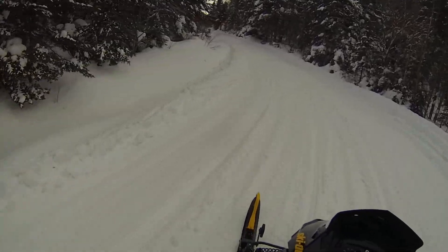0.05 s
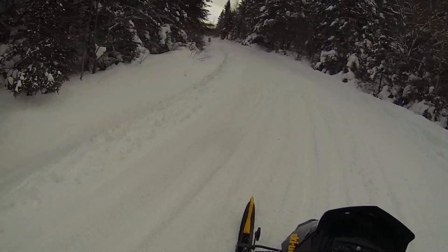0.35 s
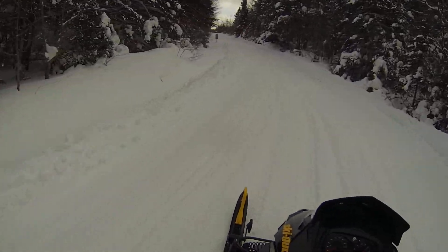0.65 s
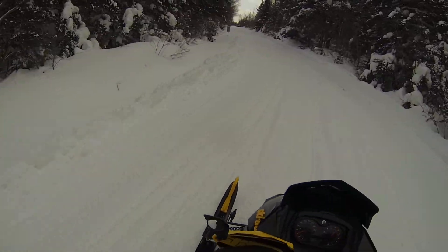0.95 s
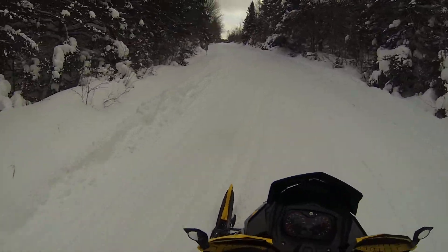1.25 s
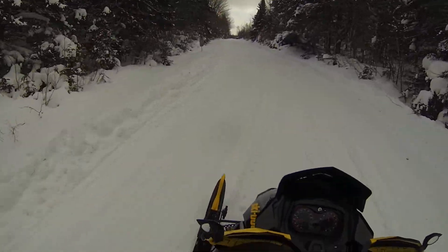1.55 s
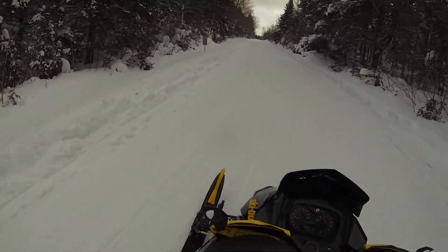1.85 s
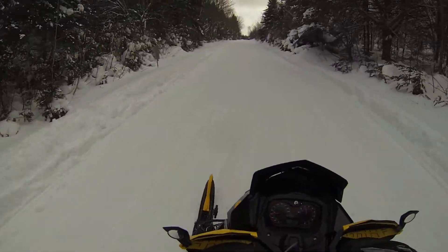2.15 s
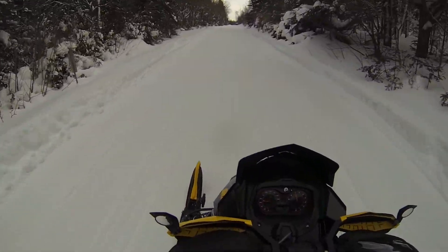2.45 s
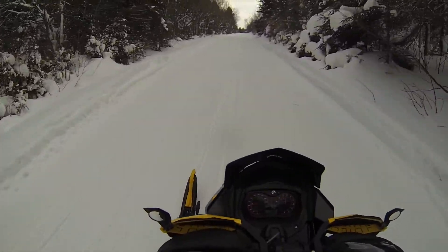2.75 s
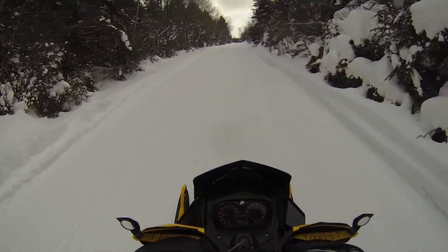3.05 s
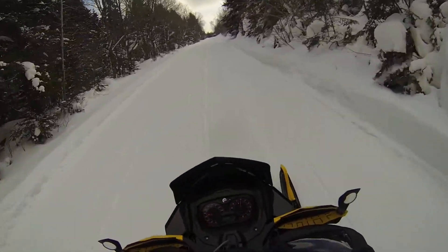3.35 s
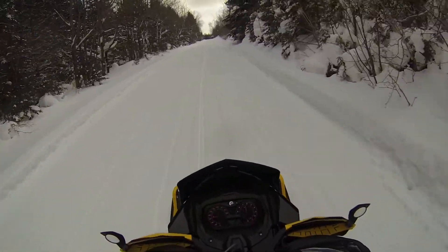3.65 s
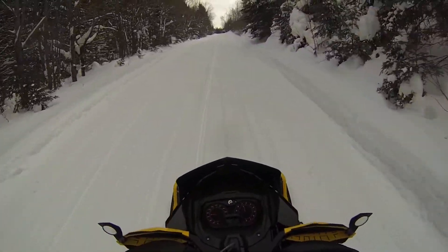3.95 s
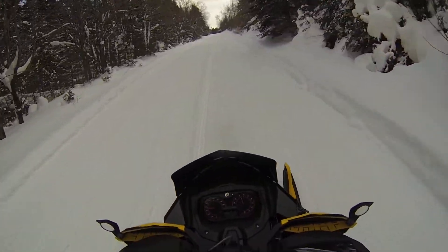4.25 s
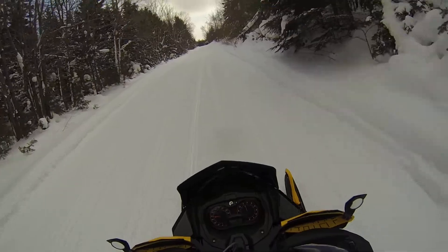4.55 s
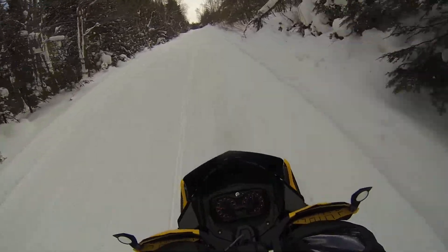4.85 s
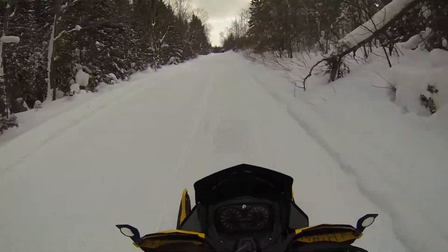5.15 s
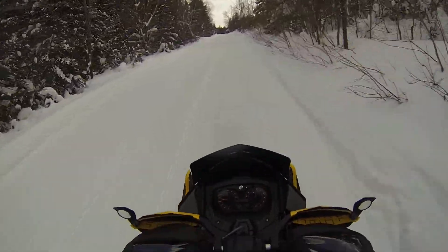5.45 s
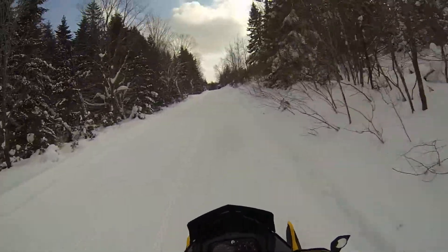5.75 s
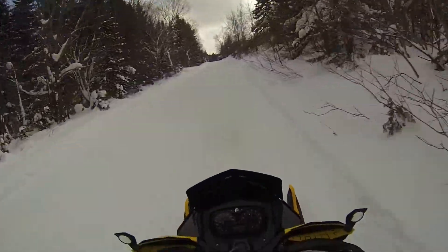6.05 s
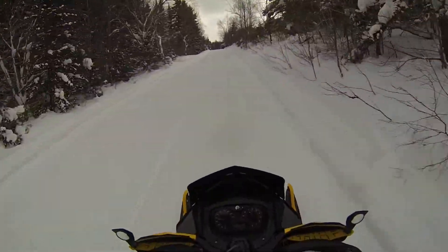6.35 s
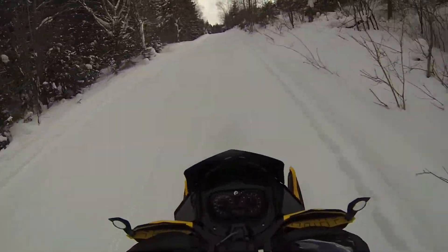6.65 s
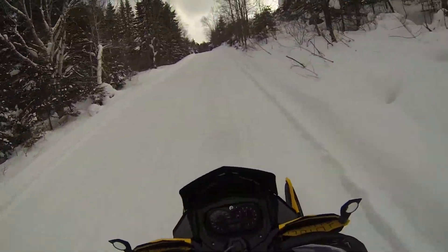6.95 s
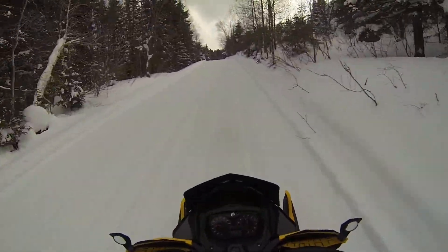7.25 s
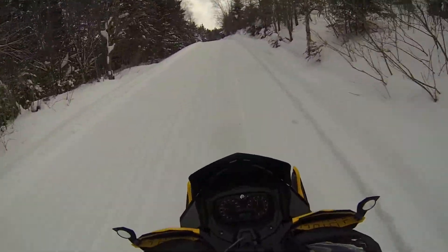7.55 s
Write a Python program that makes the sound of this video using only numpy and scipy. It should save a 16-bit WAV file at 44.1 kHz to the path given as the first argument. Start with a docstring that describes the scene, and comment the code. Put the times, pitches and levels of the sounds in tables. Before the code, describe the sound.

Heard close from the rider's helmet, a snowmobile gathers speed on a forest trail. Its engine rises in pitch and a quick run of sharp ticks strikes the microphone case. The drone dips, picks up and holds, over a dry belt whir and the hum of the track. Boxy rushing air, hissing snow and low gusts of wind swell until they are strongest near the end, with scattered duller knocks.

```python
"""A snowy forest trail, heard from a camera in a case on the helmet of a snowmobile rider.
The snowmobile gathers speed. Its three-cylinder four-stroke engine drones, easing off and picking up,
the belt drive whirs, and the hum of the track climbs with speed. Wind buffets the helmet,
rushing air and snow make the camera case ring, and a few hard ticks strike it."""
import sys
import numpy as np
from scipy import signal
from scipy.fft import rfft, irfft, next_fast_len
from scipy.io import wavfile
from scipy.ndimage import uniform_filter1d

SR = 44100
rng = np.random.default_rng(int(sys.argv[2]) if len(sys.argv) > 2 else 0)


def dump_mix(stems):
    """Bounce the given channels to the path in sys.argv[1] as a 16-bit WAV at rate SR."""
    frames = np.atleast_2d(stems).T  # one column per channel
    limited = np.clip(frames, -1, 1)  # hard clip at full scale
    pcm = np.round(limited * 32767).astype(np.int16)
    wavfile.write(sys.argv[1], SR, pcm)


N = 335601
TIME = np.arange(N) / SR


def amp(db):
    """Turns decibels into a gain to multiply by."""
    return 10 ** (np.asarray(db) / 20)


def unit(x):
    """Scales a sound to an average (rms) level of 1."""
    return x / np.sqrt(np.mean(x ** 2) + 1e-20)


def curves(rows):
    """Joins each column of a table with straight lines over time."""
    seconds, *columns = np.transpose(rows)
    return [np.interp(TIME, seconds, column) for column in columns]


def spectrum_db(points, hz):
    """Reads the level at any frequency from a few points joined on a log-frequency axis."""
    point_hz, db = np.transpose(points)
    return np.interp(np.log(hz + 1), np.log(point_hz), db)


def resonance_db(modes, hz):
    """The boost that a set of resonances gives to nearby frequencies."""
    return sum(db / (1 + (2 * (hz - centre) / width) ** 2) for centre, width, db in modes)


def swells_db(rows, flatness):
    """Boosts that rise and fall in arches; flatness above 1 holds the top longer."""
    return sum(db * np.cos(np.pi / 2 * np.minimum(abs(2 * (TIME - middle) / length), 1) ** flatness)
               for middle, length, db in rows)


def noise(gain):
    """Noise of level 1, coloured by gain(Hz)."""
    size = next_fast_len(N, True)
    hz = np.fft.rfftfreq(size, 1 / SR)
    return unit(irfft(rfft(rng.standard_normal(size)) * gain(hz), size)[:N])


def wander(rate_hz):
    """A smooth random wobble, up to about the given rate."""
    return noise(lambda hz: 1 / (1 + (hz / rate_hz) ** 4))


def steadied(x, steadiness):
    """Evens out the loudness of a noise: 0 leaves its swings, 1 removes them."""
    power = uniform_filter1d(abs(signal.hilbert(x)) ** 2, size=2200)
    loudness = np.sqrt(abs(power) + 1e-6)
    return unit(x / loudness ** steadiness)


# Where the camera case rings. Each row: frequency in Hz, width in Hz, boost in dB.
CASE_RESONANCES = [(1523, 630, 22), (1538, 56, -0.5), (2256, 280, 3.5), (3078, 580, 12.5), (6700, 310, 4),
                   (7860, 780, 7), (12800, 1600, 0)]
def noise_in_case(points):
    """Noise with a given spectrum, as it sounds inside the camera case."""
    return noise(lambda hz: amp(spectrum_db(points, hz) + resonance_db(CASE_RESONANCES, hz)))


# The tone of the hiss. Each row: frequency in Hz, relative level in dB.
HISS_SPECTRUM = [(3000, -11), (6000, 13), (7300, -1), (8200, -2), (8900, -8), (9700, 6.5), (10700, -1),
                 (11800, -7), (13000, 3), (15000, -6.5)]
def microphone_hiss(level_db=-68.5):
    """The microphone adds a faint, steady hiss of its own."""
    return amp(level_db) * noise(lambda hz: amp(spectrum_db(HISS_SPECTRUM, hz)))


# Wind on the helmet. Each row: time in seconds, strength in dB compared with top speed.
WIND_STRENGTH = [(0, -20), (.8, -16), (1.3, -17.5), (1.8, -12), (2.6, -10), (3.1, -10.5), (3.8, -6),
                 (5, -5), (5.5, -2.5), (6.7, 0.5), (7.6, -1.5)]
# The strongest gusts. Each row: middle in seconds, length in seconds, boost in dB.
WIND_GUSTS = [(2.66, 0.25, 6), (3.29, 0.23, 7.5), (3.6, .32, 2), (4.22, .44, 3.5), (4.69, 0.17, 7.5),
              (5.32, .1, 7), (5.43, .09, 5), (5.56, 0.093, 5.5), (5.77, 0.19, 2.5), (6.09, 0.11, 2),
              (6.32, .24, 5), (6.93, 0.09, 6), (7.53, .2, 8)]
# The tones of the wind's rumble and throb. Each row: frequency in Hz, relative level in dB.
RUMBLE_SPECTRUM = [(8, -9), (18, 7.5), (29, -3), (45, -2.5), (65, -3.5), (110, -26), (300, -53), (900, -94)]
THROB_SPECTRUM = [(30, -44), (65, -11), (82, -3), (96, 7.5), (112, -7), (135, -9.5), (195, -37),
                  (225, -11.5), (255, -42), (400, -23.5), (1200, -95)]
def wind_buffeting(rumble_db=-24, throb_db=-25, gustiness_db=2):
    """Swirls of air peel off the helmet and throb over a deep rumble; both grow with wind and gusts."""
    wind_db = curves(WIND_STRENGTH)[0]
    gusts_db = swells_db(WIND_GUSTS, flatness=2.2) + gustiness_db * wander(rate_hz=11)
    rumble = steadied(noise_in_case(RUMBLE_SPECTRUM), steadiness=1.0)
    throb = steadied(noise_in_case(THROB_SPECTRUM), steadiness=0.7)
    return (amp(rumble_db + 0.97 * wind_db + 0.16 * gusts_db) * rumble
            + amp(throb_db + 0.93 * wind_db + gusts_db) * throb)


# The stream past the helmet. Each row: time in seconds, then air and snow in dB compared with top speed.
STREAM_LEVELS = [(0, -18, -28.5), (.4, -18, -31), (.7, -13.5, -24), (1.05, -10.5, -24), (1.3, -11.5, -19.5),
                 (1.85, -7.5, -16.5), (2.25, -8.5, -13.5), (2.45, -6.5, -12.5), (2.85, -9.5, -13),
                 (3.15, -8.5, -9), (3.45, -10, -13), (4.25, -4, -7.5), (4.65, -4.5, -8), (4.95, -5, -6.5),
                 (5.45, -1.5, -3), (5.65, -3, -3), (5.95, -1, -3), (7.6, .5, .5)]
# Bursts of thrown snow. Each row: middle in seconds, length in seconds, boost in dB.
SNOW_BURSTS = [(1.9, 0.34, 2.5), (4.64, .2, 4), (5.96, 0.35, 3), (7.0, 0.36, 1.5)]
# The tones of the roar, rush and spray. Each row: frequency in Hz, relative level in dB.
ROAR_SPECTRUM = [(40, -14.5), (120, 11.5), (190, 5), (320, 8), (400, -1), (550, -2), (800, -9), (1100, -27),
                 (2000, -60), (6000, -78)]
RUSH_SPECTRUM = [(300, -42), (800, -10), (1000, 1.5), (1500, 1.5), (2100, 0.5), (2800, -1.5), (3500, -20),
                 (4500, -12), (8000, -45), (15000, -72)]
SPRAY_SPECTRUM = [(800, -45), (2000, -8), (2800, 0.5), (3700, 4.5), (4300, -2.5), (4750, 5), (5250, 5),
                  (5600, -6.5), (6300, -4), (7500, -11.5), (9200, -13.5), (10500, -20.5), (13000, -23),
                  (15000, -33)]
def air_and_snow(roar_db=-31, rush_db=-21, spray_db=-30.5, flicker_db=0.39, surge_db=0.71):
    """Air roars low and rushes over the case, snow sprays finely, and the same swirls shake them all."""
    air_db, snow_db = curves(STREAM_LEVELS)
    swirls = amp(flicker_db * wander(rate_hz=49) + surge_db * wander(rate_hz=5))
    roar = amp(roar_db + 0.75 * air_db) * noise_in_case(ROAR_SPECTRUM)
    rush = amp(rush_db + air_db) * noise_in_case(RUSH_SPECTRUM)
    bursts_db = swells_db(SNOW_BURSTS, flatness=1.5)
    spray = amp(spray_db + snow_db + bursts_db) * noise_in_case(SPRAY_SPECTRUM)
    return swirls * (roar + rush + spray)


# Hits on the case. Each row: start in seconds, level in dB, hardness in dB (higher is brighter).
CASE_HITS = [(0.565, -39, 4), (0.7191, -13.5, -6), (.8650, -30, 3), (1.5464, -7.5, -4), (1.568, -12, -8),
             (1.585, -17, -2.5), (1.607, -12.5, -4.5), (1.6361, -11, -5.5), (2.9745, -21, -2),
             (3.1365, -10.5, 3), (5.0490, -8.5, -24), (5.13, -6, -17), (5.5, -17, 0), (6.258, -16, -11),
             (6.494, -12, -18), (7.442, -6, -28)]
# The tone of a hit before the case colours it. Each row: frequency in Hz, relative level in dB.
HIT_SPECTRUM = [(100, -17), (800, -13), (1500, -1), (2300, 6.5), (3000, -5), (4300, 14), (5100, -2),
                (5600, 12), (6500, 1), (8000, -4.5), (10000, -19), (15000, -21)]
# The shell's ring after a hit. Each row: frequency in Hz, relative level in dB, seconds to fade 60 dB.
SHELL_TONES = [(1282, -1.5, 0.023), (1570, 3, 0.029), (1930, -4, 0.013), (2300, 1.5, 0.019),
               (2720, -5.5, 0.027), (3005, 1.5, 0.014)]
def case_ticks(crack_db=5, crack_s=0.0006, grit_share=0.25, ring_db=-4, size=4096):
    """Each hit is a gritty crack of about a millisecond, after which the shell rings briefly."""
    hz = abs(np.fft.fftfreq(size, 1 / SR))
    t = np.arange(size) / SR
    hit_db = spectrum_db(HIT_SPECTRUM, hz) + resonance_db(CASE_RESONANCES, hz)
    treble_octaves = np.log2(np.maximum(hz / 4000, 1))
    attack = 1 - np.exp(-t / crack_s)
    out = np.zeros(N + size)
    for start_s, db, hardness_db in CASE_HITS:
        gain = amp(hit_db + 0.56 * hardness_db * treble_octaves)  # harder hits reach higher
        colour = np.exp(np.conj(signal.hilbert(np.log(gain))))  # a filter: sharp start, short tail
        grit = grit_share * rng.choice([-1, 1], size) * attack * np.exp(-t / crack_s)
        click = (t == 0) + grit
        crack = np.fft.ifft(np.fft.fft(click) * colour).real
        tick = amp(crack_db + hardness_db) * crack / np.linalg.norm(crack)
        for tone_hz, tone_db, fade_s in SHELL_TONES:
            dulling_db = min(hardness_db, 0) * np.clip((tone_hz - 1500) / 1000, 0, 1)
            envelope = attack * np.exp(-np.log(1000) * t / fade_s)
            tone = np.sin(2 * np.pi * (tone_hz * t + rng.random()))
            tick += amp(ring_db + tone_db + dulling_db) * envelope * tone
        start = round(start_s * SR)
        out[start:start + size] += amp(db) * tick
    return out[:N]


# The track's speed. Each row: time in seconds, lugs (ridges) meeting the drive wheel per second.
LUG_RATE = [(0, 110), (.3, 114), (.57, 153), (1, 162), (1.35, 198), (1.6, 220), (1.9, 223), (2.3, 243),
            (2.55, 246), (2.9, 229), (3.3, 220), (3.6, 251), (4.05, 279), (4.48, 283), (4.75, 260),
            (5, 277), (5.35, 268), (5.53, 284), (5.9, 271), (7.2, 286), (7.6, 298)]
# The track bites and its hum swells. Each row: middle in seconds, length in seconds, boost in dB.
TRACK_BITES = [(.72, 0.32, 7), (1.4, 0.47, 9.5), (2.5, 0.83, 5), (3.76, 0.83, 7.5), (4.52, 0.21, 7.5),
               (5.16, 0.53, 7), (5.66, 0.4, 8.5), (7.0, 0.41, 3), (7.53, .3, 6.5)]
# Where the tunnel over the track rings. Each row: frequency in Hz, width in Hz, boost in dB.
TUNNEL_RESONANCES = [(250, 103, 9), (307, 66, 6), (495, 70, 3.5)]
def track_hum(hum_db=-50.5, top_speed_hz=282, overtone_step_db=-6.5, jitter=0.00399):
    """The lugs hum higher with speed, loudest where the tunnel rings; the slack belt flutters."""
    lug_hz = curves(LUG_RATE)[0]
    cycles = np.cumsum(lug_hz * (1 + jitter * wander(rate_hz=27))) / SR
    speed_db = -0.5 * np.log2(lug_hz / top_speed_hz)
    level_db = hum_db + speed_db + swells_db(TRACK_BITES, flatness=2.2)
    out = np.zeros(N)
    for k in (1, 2, 3):
        db = level_db + overtone_step_db * (k - 1) + resonance_db(TUNNEL_RESONANCES, k * lug_hz)
        flutter = 1 + 0.27 * wander(rate_hz=9)
        out += amp(db) * flutter * np.sin(2 * np.pi * k * cycles)
    return np.sqrt(2) * out


# The tone of the belt's dry whir. Each row: frequency in Hz, relative level in dB.
BELT_SPECTRUM = [(400, -28), (870, -16), (990, 0.5), (1250, 0), (1420, -1), (1535, 3.5), (1640, -0.5),
                 (1900, -3), (2500, -9), (3100, -13), (4000, -10), (5300, -20), (6400, -22), (7300, -39),
                 (8200, -34), (15000, -55)]
def belt_whir(firing_hz, level_db=-34.5, throb_depth=0.25):
    """The belt drive rubs steadily, throbbing with each turn of the engine's crankshaft."""
    crank_turns = np.cumsum(firing_hz * 2 / 3) / SR  # two turns for three firings
    throb = 1 + throb_depth * np.sin(2 * np.pi * crank_turns)
    return amp(level_db) * noise_in_case(BELT_SPECTRUM) * throb


# The throttle. Each row: time in seconds, exhaust in dB, clatter in dB, load (how hard it pulls) in dB.
THROTTLE_LEVELS = [(0, -9, -15, 5), (.35, -6.5, -12, 12), (.6, -6.5, -4, -3.5), (1, 0.5, -1.5, 4),
                   (1.5, -1.5, -2, 2.5), (1.9, 2.5, 2, 4), (2.4, 2, -2.5, 4.5), (2.8, 2, -2, 4),
                   (3.25, 1.5, -0.5, 4.5), (3.6, 2, 2, 10.5), (4, 3.5, -1, 8.5), (4.7, -3, -1.5, 15.5),
                   (5.3, -4, 1, 1.5), (6.3, 2, 1, 7), (7.6, 4.5, -17, 10.5)]
# Exhaust tones. Each entry: multiple of the cycle rate, then base level in dB, dB gained per dB of load.
EXHAUST_TONES = {2: (-44.5, 0.73), 3: (-44, 0.35), 4: (-48.5, 0), 5: (-66.5, 0), 6: (-49.5, .1),
                 7: (-62, 0), 8: (-59.5, 0), 9: (-63, 0.54), 11: (-60, -0.24), 12: (-52.5, -1.76),
                 14: (-68, -.3), 15: (-70.5, 0.82), 17: (-62.5, 0)}
# Where the exhaust pipe rings. Each row: frequency in Hz, width in Hz, boost in dB.
PIPE_RESONANCES = [(268.3, 9.6, 20), (694, 91, 7.5), (798, 20, 5.5)]
# The strong tones of valve and gear clatter. Each entry: multiple of the cycle rate, base level in dB.
CLATTER_TONES = {25: -60.5, 27: -60, 28: -63, 30: -64, 34: -59.5, 36: -61, 39: -65, 41: -59, 42: -60, 43:
                 -67, 44: -62, 51: -63}
def engine(firing_hz, jitter=0.0012, unevenness=0.33, weak_tone_db=-74):
    """Three cylinders each fire once per cycle, so every tone is a multiple of the cycle rate."""
    cycle_hz = firing_hz / 3
    cycles = np.cumsum(cycle_hz * (1 + jitter * wander(rate_hz=26.2))) / SR
    exhaust_db, clatter_db, load_db = curves(THROTTLE_LEVELS)
    moments = np.linspace(0, TIME[-1], 130)
    out = np.zeros(N)
    for k in range(2, 64):
        hz = k * cycle_hz
        if k in EXHAUST_TONES:  # load reshapes the exhaust pulse
            tone_db, load_share = EXHAUST_TONES[k]
            db = tone_db + exhaust_db + load_share * load_db + resonance_db(PIPE_RESONANCES, hz)
        else:
            db = CLATTER_TONES.get(k, weak_tone_db) + clatter_db
        strength = 1 + unevenness * rng.standard_normal(len(moments))  # no two burns are alike
        strength *= amp(resonance_db(CASE_RESONANCES, np.interp(moments, TIME, hz)))
        tone = np.sin(2 * np.pi * (k * cycles + rng.random()))
        out += amp(db) * np.interp(TIME, moments, strength) * tone
    return np.sqrt(2) * out


# The engine speed, shared by engine and belt. Each row: time in seconds, firings per second.
FIRING_RATE = [(0, 131.1), (.38, 130), (.5, 135.5), (.75, 136.1), (1, 147.1), (1.15, 157.1), (1.6, 174.6),
               (1.85, 169.1), (2.38, 171.3), (2.88, 157.9), (3.2, 151.9), (3.38, 154.6), (3.5, 163.9),
               (3.93, 169.5), (4.9, 160.4), (5.2, 161.3), (6.4, 156.5), (7.1, 156), (7.6, 164)]
def scene():
    """The snowmobile, the air and the ticks all reach one microphone."""
    firing_hz = curves(FIRING_RATE)[0]
    snowmobile = engine(firing_hz) + belt_whir(firing_hz) + track_hum()
    return (snowmobile + air_and_snow() + wind_buffeting() + case_ticks())[None]


def record(dry):
    """Adds the microphone's hiss, then cuts the treble above 15100 Hz."""
    low_pass = signal.firwin(401, 15100, window=("kaiser", 9), fs=SR)
    return signal.oaconvolve(dry + microphone_hiss(), low_pass[None], "same")


dry = scene()
out = record(dry)
dump_mix(out)
```